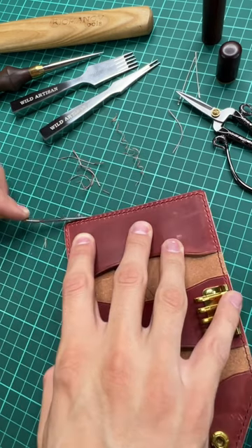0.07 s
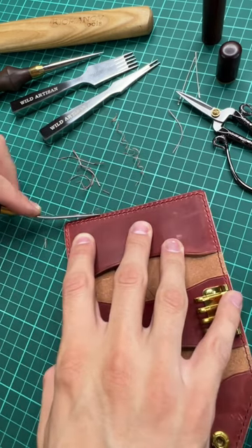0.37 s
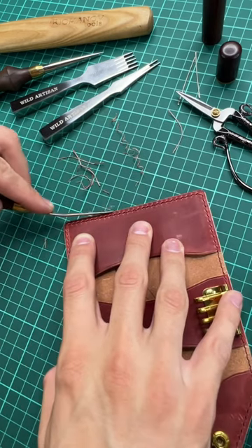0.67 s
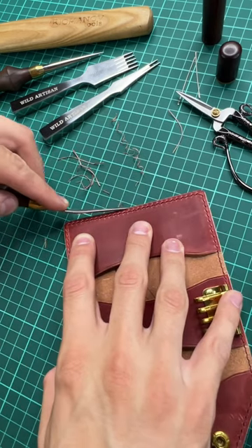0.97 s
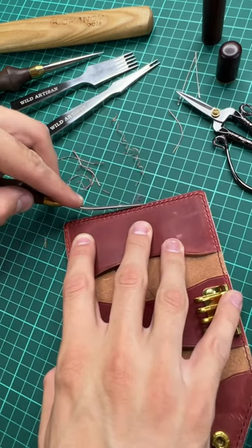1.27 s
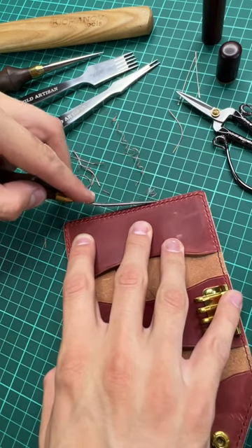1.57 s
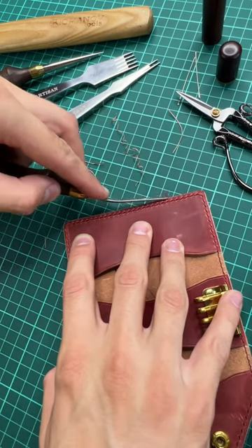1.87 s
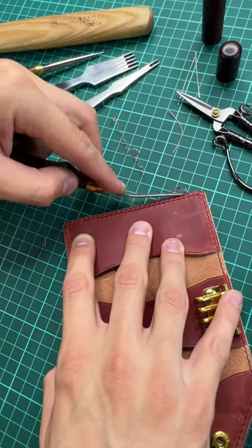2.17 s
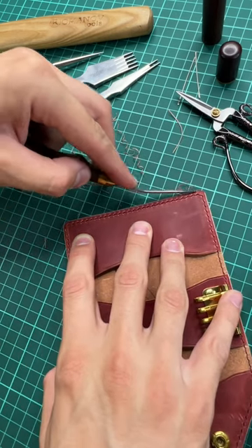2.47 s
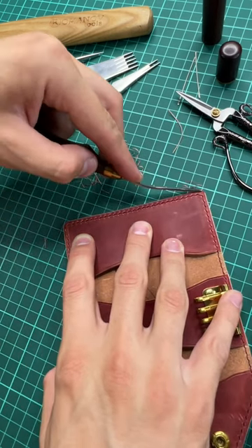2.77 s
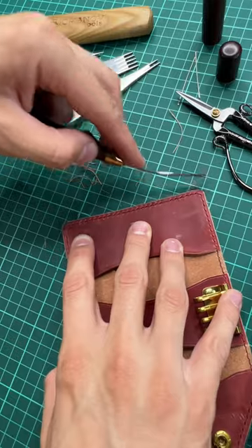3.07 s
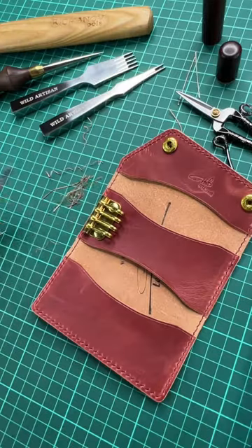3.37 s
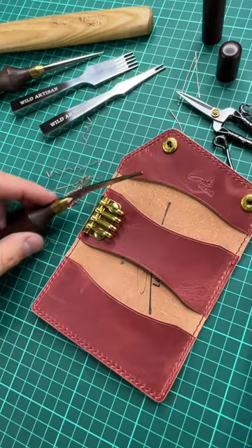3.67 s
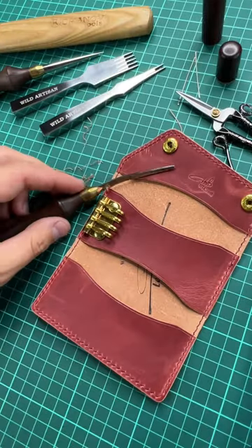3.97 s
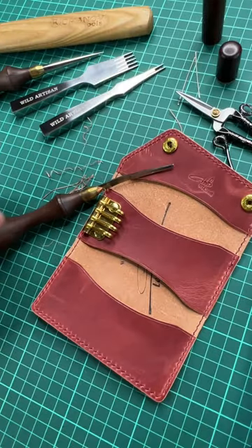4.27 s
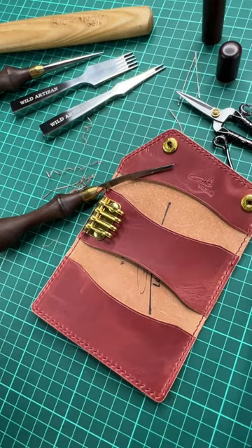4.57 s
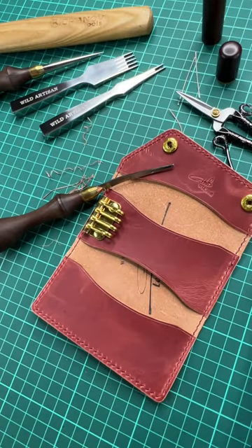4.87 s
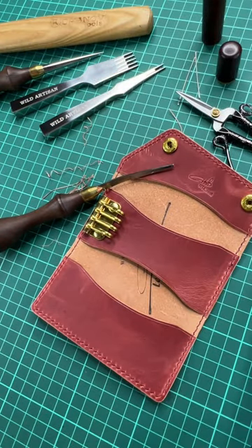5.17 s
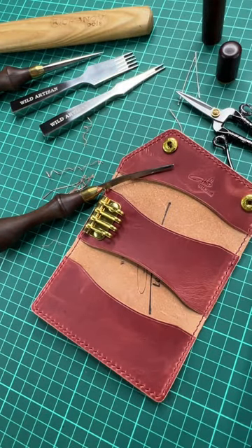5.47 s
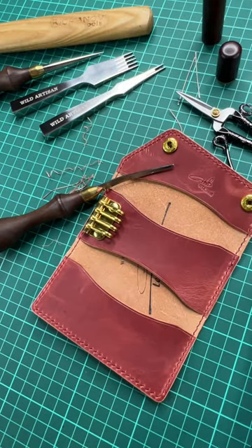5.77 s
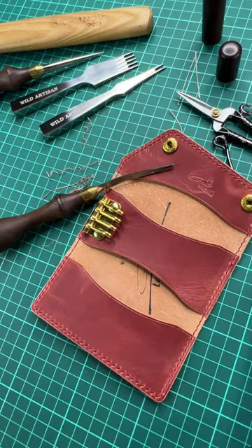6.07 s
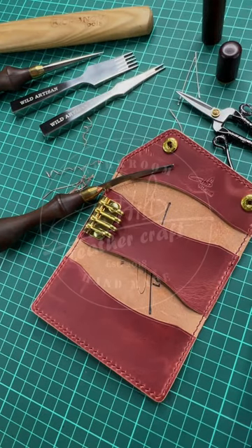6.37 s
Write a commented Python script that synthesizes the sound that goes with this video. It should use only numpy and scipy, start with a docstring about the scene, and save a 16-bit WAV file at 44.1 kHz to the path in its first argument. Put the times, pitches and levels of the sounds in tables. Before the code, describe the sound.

A steel cutter softly shaves a leather edge, then clicks, a hand brushes a mat and something hard knocks on the table.

```python
"""Shaving the edge of a leather wallet

In a small room with a humming fan, an edge cutter shaves a wallet on a mat, close by: tiny fibres snap,
hiss and make the steel ring. The blade clicks off the corner, a hand brushes the mat, something hard
knocks on the table and the cutter is put down. Soft scuffs and thumps follow as the worker moves away."""
import sys
import numpy as np
from scipy import signal
from scipy.fft import rfft, irfft, next_fast_len
from scipy.io import wavfile
from scipy.ndimage import uniform_filter1d

SR = 44100
rng = np.random.default_rng(int(sys.argv[2]) if len(sys.argv) > 2 else 0)


def persist_wave(psi):
    """Save psi, clipped to +-1, as 16-bit WAV."""
    counts = np.round(np.clip(psi, -1, 1) * 32767).astype(np.int16)
    wavfile.write(sys.argv[1], SR, np.atleast_2d(counts).T)


N = 282681
T = np.arange(N) / SR
PADDED = next_fast_len(N, True)
HZ = np.fft.rfftfreq(PADDED, 1 / SR)


def amp(db):
    return 10 ** (np.asarray(db) / 20)


def unit(x):
    """Scales a signal to an average (rms) size of 1."""
    return x / np.sqrt(np.mean(x ** 2) + 1e-30)


def at_hz(points, hz=HZ):
    f, value = np.transpose(points)
    return np.interp(np.log(hz + 1), np.log(f + 1), value)


def over_time(points):
    return np.interp(T, *np.transpose(points))


def add(mix, s, sound):
    part = mix[:, round(s * SR):][:, :sound.shape[-1]]
    part += sound[..., :part.shape[1]]


def pan(db):
    """Gains that make the left channel db louder than the right."""
    return amp(np.array([[db], [-db]]) / 2)


def colour(x, gain):
    """Filters by a gain for each frequency, then scales to size 1."""
    return unit(irfft(rfft(x, PADDED) * gain, PADDED)[..., :N])


def peak(hz, width_hz):
    """Filter gains that favour one narrow band."""
    return 1 / (1 + 1j * (HZ - hz) / width_hz * np.sqrt(2)) ** 2


def resonate(x, hz, width_hz):
    """Makes x ring at a pitch that follows the curve hz."""
    turn = np.exp(2j * np.pi * np.cumsum(hz) / SR)
    decay = np.exp(-np.pi * width_hz / SR)
    return unit((turn * signal.lfilter([1], [1, -2 * decay, decay * decay], x / turn)).real)


def envelope(s, rise, hold, t60):
    """From time s: rises, holds, then fades by 60 dB every t60 seconds."""
    age = np.maximum(T - s, 0)
    return np.minimum(age / rise, 1) * amp(-60 * np.maximum(age - rise - hold, 0) / t60)


def stereo(x, widest_db):
    """Sets the stereo width per band, up to widest_db: mostly centred, wide around 500-950 Hz,
    top treble in opposite phase left and right."""
    # stereo width: f/Hz, side level against mid/dB
    widths = [(50, -12), (120, -8), (220, -6.5), (360, -5), (530, 5.5), (720, 2), (950, 4.5), (1300, -7),
              (1800, -20), (2500, -6), (4400, -2.5), (5600, -10.5), (7200, -14.5), (8300, -4.5), (11200, 2),
              (11800, 10), (12400, 36), (16000, 37)]
    mid, side = rfft(x, PADDED)
    width = amp(np.minimum(at_hz(widths), widest_db))
    left_right = np.array([mid + width * side, mid - width * side]) / np.sqrt(1 + width ** 2)
    return irfft(left_right, PADDED)[:, :N]


def noise(widest_db=32):
    return stereo(rng.standard_normal((2, N)), widest_db)


def drift(rate_hz):
    """A slow random wobble of size 1."""
    return colour(rng.standard_normal(N), 1 / (1 + (HZ / rate_hz) ** 4))


def patchy(x, depth_db=2.0):
    """As the contact travels, narrow bands of the hiss come and go."""
    bands = signal.stft(x, SR, nperseg=512)[2]
    patches = uniform_filter1d(rng.standard_normal(bands.shape[1:]), size=5, axis=0)
    patches = unit(uniform_filter1d(patches, size=36, axis=1))
    return signal.istft(bands * amp(depth_db * patches), SR, nperseg=512)[1][:, :N]


def tiny_snaps(per_s, spread_db):
    """Countless tiny snaps of unequal size at random moments."""
    size = amp(spread_db * np.minimum(rng.exponential(1, N), 4))
    happens = rng.random(N) < per_s / SR
    return unit(stereo(rng.standard_normal((2, N)) * size * happens, widest_db=32))


def room_tail():
    """The room's dense echoes, each band dying at its own speed."""
    # how long the room rings: f/Hz, t60/s
    fades = [(100, 0.25), (280, 0.87), (700, 0.38), (1500, 0.19), (4000, 0.29), (12000, 0.047)]
    hz, t, bands = signal.stft(noise()[:, :SR], SR, nperseg=256)
    fade = amp(-60 * t / at_hz(fades, hz)[:, None])
    tail = signal.istft(bands * fade, SR, nperseg=256)[1][:, :SR]
    tail *= 1 - np.exp(-(T[:SR] / 0.0021) ** 2)
    return tail / np.linalg.norm(tail[0])


def fan_and_lamp(mains_hz=60):
    """A small fan rushes, whistles and hums; a lamp's power supply whines once in every mains cycle."""
    # the fan's rush and its thin treble: f/Hz, level/dB
    rush = [(25, -19), (70, 8.5), (125, 12.5), (200, 4.5), (330, 2), (560, 0), (830, -7), (1200, 3),
            (1550, -1), (2450, -1), (3300, -8), (4200, -13), (5100, -27.5), (6500, -13.5)]
    rush_top = [(7600, -16), (8800, -20), (9900, -27.5), (12000, -25.5), (14000, -12.5), (16000, -44)]
    # fan whistles and lamp whine: f/Hz, width/Hz, level/dB
    whistle_bands = [(1915, 193, -70.5), (2398, 195, -70.5)]
    whine_bands = [(6854, 120, -83), (9126, 170, -81.5)]
    # the fan's wavering hum: f/Hz, level/dB
    hum_tones = [(118.8, -64), (170.3, -72.5)]
    air = amp(-63) * colour(noise(), amp(at_hz(rush + rush_top)))
    flow = noise()
    whistles = sum(amp(db) * colour(flow, peak(hz, width)) for hz, width, db in whistle_bands)
    spurts = unit(amp(6.2 * np.cos(2 * np.pi * mains_hz * T)))
    whine = spurts * sum(amp(db) * colour(flow, peak(hz, width)) for hz, width, db in whine_bands)
    hum = sum(amp(db + 3.74 * drift(6)) * np.sqrt(2) * np.sin(2 * np.pi * hz * T + 0.23 * drift(9.2))
              for hz, db in hum_tones)
    end_dip_db = np.interp(T, [5.9, 6.4], [0, -3])
    return (air + whistles + whine + hum) * amp(end_dip_db)


def table_rumble():
    """The table's lumpy bass: each jolt rises, holds and dies away over a faint tremble."""
    # tone of the shaking table: f/Hz, level/dB
    tone = [(12, -43), (20, -34), (32, 16), (48, 17), (124, -4.5), (145, -30), (166, -34), (193, -0.5),
            (247, -70), (300, -11.5), (390, -52), (660, -120)]
    # tremble under resting arms: t/s, level/dB
    tremble = [(0, -61), (1.3, -66.5), (4.4, -69), (6.05, -72), (6.4, -81)]
    # arms and feet jolting the table: t/s, level/dB, hold/s
    jolts = [(0.305, -49, 0.11), (0.517, -58, 0.19), (1.784, -59.5, 0.056), (2.39, -61.5, .05),
             (2.926, -59, .03), (3.359, -47, 0.012), (3.646, -46.5, 0.22), (3.932, -53, 0.11),
             (5.234, -54, 0.12), (5.37, -57.5, 0.15), (5.672, -48.5, 0.017), (5.787, -60, 0.025)]
    rumble = colour(rng.standard_normal(N), amp(at_hz(tone)))
    rumble /= np.sqrt(uniform_filter1d(rumble ** 2, size=2200) + 0.0055)  # evens out the loudness
    rumble = colour(rumble, 1 - 1 / (1 + (HZ / 31) ** 8))  # cuts below the table's lowest sway
    power = amp(over_time(tremble)) ** 2
    for s, db, hold in jolts:
        power += (amp(db) * envelope(s, rise=0.024, hold=hold, t60=0.37)) ** 2
    return rumble * np.sqrt(power)


def scuffs():
    """Dull scuffs and thumps swell and die away, coloured by the hollow table."""
    # each contact: t/s, level/dB, rise/s, t60/s, treble limit/Hz
    contacts = [(.21, -62.5, 0.046, 2.1, 1030), (2.954, -46, 0.0022, 0.075, 480),
                (3.045, -53.5, 0.0013, 0.079, 525), (3.072, -61, .008, 0.3, 260),
                (3.124, -52, 0.0031, 0.24, 310), (3.17, -59, 0.0055, 0.16, 240),
                (3.628, -55, 0.018, 0.41, 480), (3.742, -60.5, 0.0086, 0.48, 372),
                (4.032, -61.5, 0.0059, 0.57, 350), (4.982, -60, 0.0096, 0.76, 1210),
                (5.014, -55, 0.022, 0.37, 450), (5.229, -53, 0.01, 0.76, 1280),
                (5.25, -56, 0.022, 0.26, 330), (5.41, -59, 0.034, 0.56, 660)]
    # tone of a scuff: f/Hz, level/dB
    tone = [(50, -4), (110, 0.5), (280, 1), (400, -2), (520, -6), (610, -13), (720, -3), (830, 4),
            (980, -4), (1300, 3)]
    # the table's hollow rings: f/Hz, width/Hz, level/dB
    rings = [(510, 30, 3.5), (680, 17, 12), (912, 34, 7), (1054, 54, 7)]
    out, rub = np.zeros((2, N)), noise(widest_db=0.5)
    body = amp(at_hz(tone)) + sum(amp(db) * abs(peak(hz, width)) for hz, width, db in rings)
    for s, db, rise, t60, top_hz in contacts:
        swell = amp(db) * envelope(s, rise, 0, t60)
        out += swell * colour(rub, body / (1 + (HZ / top_hz) ** 6))
    return out


def hand_brush():
    """Skin sliding over the mat makes a gritty hiss that swells and fades with each sweep."""
    # hand sweeps: fastest at t/s, level/dB, swell/s, fade/s, treble tilt/dB per octave
    sweeps = [(3.09, -72, 0.025, 0.025, 5), (3.195, -54.5, 0.031, 0.0094, -12.5),
              (3.24, -59.5, 0.036, 0.032, 1), (3.299, -56.5, 0.034, 0.038, -3.5),
              (3.43, -55.5, 0.1, 0.083, -5.5), (3.579, -58, 0.084, 0.23, -10.5),
              (5.92, -74.5, 0.04, 0.055, -2)]
    # tone of skin on the mat: f/Hz, level/dB
    tone = [(200, -20), (500, -4), (1500, -4.5), (3000, 4), (3900, 5), (4500, 2.5), (5300, -3.5), (6400, 4),
            (7400, 1), (8300, 7.5), (9700, -2), (11000, 1), (13000, -5), (16000, -16)]
    out, grit = np.zeros((2, N)), patchy(tiny_snaps(per_s=10000, spread_db=1))
    treble_octaves = np.log2(1 + (HZ / 4000) ** 2) / 2
    for s, db, swell, fade, tilt_db in sweeps:
        level = amp(db) * np.exp(-((T - s) / np.where(T < s, swell, fade)) ** 2)
        out += level * colour(grit, amp(at_hz(tone) + tilt_db * treble_octaves))
    return out * amp(0.16 * drift(30)) * pan(1.4)


def knock(s=3.3837, crack_low_hz=603):
    """A hard blow cracks, rings the table and what stands on it, then echoes round the room."""
    # ringing tones: f/Hz, level/dB, t60/s, lag of the right channel/radians
    rings = [(157, -28, 0.033, 0.05), (189.4, -36, 0.31, 0.085), (270, -37.5, 0.12, 0.1),
             (301, -47, 0.98, 0.067), (322.5, -31, 0.16, 1), (376, -40.5, 0.3, 0.067),
             (440, -17.5, 0.018, .2), (468, -52, 0.84, 0.81), (534, -22, 0.044, 2.24), (588, -52, 1, 2.1),
             (697.4, -28.5, 0.22, 1.88), (720, -22, 0.13, 3.46), (847, -38, 0.24, 3.35),
             (903, -39, 0.09, 4.1), (996, -37, 0.16, 1.6), (1050, -26, 0.11, 1.74),
             (1225, -41, 0.098, 0.23), (1244, -31.5, 0.06, .4), (1710, -20, 0.035, 0.16),
             (1790, -15.5, 0.03, .05), (2140, -25, 0.03, 2.4), (2310, -30.5, 0.056, 1.7),
             (2590, -19.5, 0.014, 1.7), (3300, -17, 0.0035, 1.3), (4180, -9.5, 0.0056, 1.5),
             (5020, -34, 0.029, 0.79), (6150, -21.5, 0.0056, 0.79), (8060, -21, 0.0046, 0.25),
             (12500, -44, 0.0033, 0.8)]
    # crack, rebound and first echoes: delay/s, level/dB, t60/s, left minus right/dB, treble limit/Hz
    cracks = [(0, -13, 0.003, 1.5, 7300), (.0019, -21.5, 0.0021, 8, 7000), (.0046, -27.5, .012, 4, 6600),
              (0.011, -27, 0.0091, -5, 6200)]
    # tone of the room's echo: f/Hz, level/dB
    echo_tone = [(60, 2.5), (200, 1), (350, 0.5), (500, -1.5), (720, -3), (850, 1.5), (1200, 4.5),
                 (1750, 0.5), (2300, -2.5), (3000, -12.5), (4200, -11.5), (5200, -20), (8000, -15),
                 (10000, -31), (16000, -53)]
    out, echo, t = np.zeros((2, N)), np.zeros((2, N)), T[:SR]
    for hz, db, t60, lag in rings:
        build = 1 - np.exp(-(t / (0.36 / hz + 0.031 * t60)) ** 2)  # low, long tones build up more slowly
        wave = np.sin(2 * np.pi * hz * t - np.array([[0], [lag]]))
        add(out, s, build * amp(db - 60 * t / t60) * wave)
    for delay, db, t60, pan_db, top_hz in cracks:
        crack = amp(db - 60 * t / t60) * rng.standard_normal((2, SR)) * pan(pan_db)
        band = signal.butter(4, [crack_low_hz, top_hz], "bandpass", fs=SR, output="sos")
        add(out, s + delay, signal.sosfilt(band, crack))
    add(echo, s, room_tail())
    return out * pan(2.2) + amp(-56.5) * colour(echo, amp(at_hz(echo_tone)))


def cutter_clicks(echo_db=-17, echo_top_hz=7250):
    """Each light touch is a brief gritty burst that rings the steel and its handle."""
    # touches on leather, mat and brass: t/s, level/dB, tilt/dB per octave, length/s, treble limit/Hz
    touches = [(2.953, -33, 5, 0.0028, 5760), (3.0496, -43.5, -12, 0.0011, 3000),
               (3.055, -48.5, 32, 0.0065, 10000), (3.0870, -52, 26, 0.0048, 16000),
               (3.124, -39, 0.5, 0.0027, 16000), (3.202, -45, 18, 0.0035, 16000),
               (3.9718, -25, 1.5, 0.00085, 13700), (3.9747, -34, -3, 0.00052, 9000),
               (4.402, -55, 3, 0.0053, 7500)]
    # the cutter's ringing tones: f/Hz, level/dB, t60/s
    rings = [(1900, 2.5, 0.0044), (2420, -14, 0.013), (4280, -2, 0.0022), (5890, -6.5, 0.01),
             (7100, -0.5, 0.0031), (8540, -6, 0.0023), (10600, -0.5, 0.0011), (12900, -9, 0.0029),
             (15200, -5, 0.0023)]
    out, t = np.zeros((2, N)), T[:3000]
    no_bass = HZ ** 2 / (HZ ** 2 + 1100 ** 2)
    grit = colour(noise(widest_db=19), no_bass / (1 + (HZ / 15000) ** 12))
    for s, db, tilt_db, length, top_hz in touches:
        ring = np.zeros(len(t))
        for hz, ring_db, t60 in rings:
            level = amp(ring_db + tilt_db * np.log2(hz / 4000) - 60 * t / t60)
            ring += level / (1 + (hz / top_hz) ** 6) * np.sin(2 * np.pi * hz * t)
        burst = grit[:, round(s * SR):][:, :len(t)] * np.exp(-(t / length) ** 2)
        click = signal.fftconvolve(burst, ring[None], axes=1)
        add(out, s, amp(db) * click / abs(click).max())
    # echoes from the soft, cluttered bench lose their treble
    dull = signal.sosfilt(signal.butter(4, echo_top_hz, fs=SR, output="sos"), out)
    echo = signal.fftconvolve(dull, room_tail(), axes=1)[:, :N]
    return out * pan(0.84) + amp(echo_db) * echo


def cutter_ring(snaps, steel_gain):
    """Snapping fibres keep the cutter's handle, blade and stem ringing."""
    # the handle's ring, strongest in mid-stroke: t/s, level/dB
    handle = [(0.1, -87), (0.3, -65), (0.6, -78), (1.05, -92), (1.45, -73), (1.68, -59), (1.9, -63),
              (2.08, -74), (2.9, -91)]
    # two blade rings that trade places as its angle changes: t/s, f/Hz, level/dB
    blade_low = [(0.0, 5660, -9), (0.55, 5660, -9), (0.75, 5840, -2), (1.0, 5720, -9), (1.2, 5670, -1.5),
                 (1.45, 5700, 3.5), (1.65, 5720, 2.5), (1.9, 5630, 3), (2.2, 5820, -4), (2.45, 5760, -5),
                 (2.9, 5800, 6.5)]
    blade_high = [(0.0, 6400, -18), (0.45, 6350, -0.5), (0.72, 6350, 1), (1.05, 6260, -10),
                  (1.55, 6400, -17), (1.8, 6630, -3), (2.0, 6400, 2.5), (2.25, 6360, 0), (2.45, 6260, 5.5),
                  (2.9, 6100, -10)]
    # faint stem rings that come and go as the contact moves: f/Hz, width/Hz, level/dB
    stem = [(3270, 180, -18.5), (3920, 310, -13.5), (6920, 210, -14)]
    # brief zings where the blade catches: t/s, half length/s, f/Hz, level/dB
    zings = [(.02, 0.023, 7650, -68), (.3, .04, 3250, -73), (.44, .035, 3300, -69), (0.743, .04, 7840, -73),
             (0.97, 0.09, 8560, -73), (1.27, 0.083, 7500, -78), (1.656, .045, 8300, -75),
             (1.65, .04, 4000, -76), (1.854, 0.094, 8270, -71), (1.9, 0.076, 10900, -86),
             (2.003, 0.068, 3940, -72), (2.15, 0.034, 8300, -79), (2.158, 0.073, 10850, -74.5),
             (2.43, .03, 3370, -70)]
    ring = amp(over_time(handle)) * colour(snaps, peak(1870, 145))
    for s, hz, db in (np.transpose(blade_low), np.transpose(blade_high)):
        pitch = np.interp(T, s, hz) * (1 + 0.014 * drift(rate_hz=12))
        ring += steel_gain * amp(np.interp(T, s, db)) * resonate(snaps, pitch, width_hz=440)
    for hz, width, db in stem:
        waver = unit(amp(3.5 * drift(rate_hz=3)))
        ring += steel_gain * amp(db) * waver * colour(snaps, peak(hz, width))
    for s, half, hz, db in zings:
        start = max(s - 3 * half, 0)
        part = slice(round(start * SR), round((s + 3 * half) * SR))
        swell = amp(db) * np.exp(-((T[part] - s) / half) ** 2)
        add(ring, start, swell * resonate(snaps[:, part], np.full(len(swell), hz), width_hz=500))
    return ring


def hand_drag():
    """The cutting hand rubs dully over the mat."""
    # how hard it drags: t/s, level/dB
    levels = [(0, -66), (0.6, -68.5), (0.9, -62), (1.1, -64), (1.4, -60), (1.85, -63), (2.1, -67.5),
              (2.5, -62.5), (2.65, -86), (2.88, -68)]
    # tone of the rub: f/Hz, level/dB
    tone = [(80, -35), (160, 3.5), (300, 6.5), (500, -4.5), (750, -0.5), (1000, -7), (1400, -1),
            (2200, -7.5), (5000, -47)]
    return amp(over_time(levels)) * colour(patchy(noise()), amp(at_hz(tone)))


def cutting(usual_bite_db=-68, lift_s=0.018):
    """Leather fibres snap under the blade: the harder it bites, the louder they hiss, rasp and ring it."""
    # how hard the blade bites along its one long stroke: t/s, level/dB
    bite = [(0.0, -72), (0.025, -72.5), (0.1, -82), (0.15, -75), (0.26, -74.5), (0.61, -78), (0.69, -75),
            (0.755, -67.5), (0.82, -75), (0.95, -72), (1.1, -73.5), (1.19, -69.5), (1.42, -73), (1.52, -78),
            (1.6, -71.5), (1.67, -69.5), (1.75, -77.5), (1.83, -71), (1.95, -70.5), (2.06, -79.5),
            (2.15, -70.5), (2.28, -74.5), (2.365, -86), (2.41, -71), (2.45, -71.5), (2.53, -84.5),
            (2.57, -94), (2.78, -95), (2.88, -92), (2.91, -71), (2.94, -83)]
    # tones of the fine hiss and the coarser rasp below it: f/Hz, level/dB
    hiss_tone = [(3500, 1.5), (5000, 1), (5600, 4.5), (7200, 13), (8300, 9), (9300, 5.5), (10900, 4),
                 (12200, -6), (13600, 1), (16000, -19)]
    rasp_tone = [(600, 3.5), (1100, 8), (1450, -1.5), (2400, 4.5), (3200, 5.5), (3450, 2.5), (3850, 4),
                 (4900, -5.5), (7000, -30)]
    # extra rasp, most at the start and towards the corner: t/s, level/dB
    roughness = [(0, 3), (0.45, 4), (0.75, -4.5), (1.25, -1.5), (1.7, 1.5), (2.0, 1), (2.2, -1), (2.45, 0),
                 (2.9, 0)]
    bite_db = over_time(bite) - usual_bite_db
    snaps = tiny_snaps(per_s=7000, spread_db=-0.5)  # fine fibres
    snaps += amp(-11) * tiny_snaps(per_s=400, spread_db=1.3)  # a few tough ones
    grit = patchy(snaps)
    hiss = amp(-64.5 + bite_db) * colour(grit, amp(at_hz(hiss_tone)))
    rasp = amp(-64 + 0.75 * bite_db + over_time(roughness)) * colour(grit, amp(at_hz(rasp_tone)))
    ring = cutter_ring(snaps, steel_gain=amp(-66 + 1.03 * bite_db))
    rub = hand_drag()
    flicker = amp(0.8 * drift(14))
    end_s = bite[-1][0]
    lift_off = np.interp(T, [end_s, end_s + lift_s], [1, 0])
    return ((hiss + rasp + ring) * flicker * pan(0.81) + rub) * lift_off


def scene():
    return cutting() + hand_brush() + table_rumble() + scuffs() + cutter_clicks() + knock() + fan_and_lamp()


def record(dry):
    """Cuts the highest treble, above 15.8 kHz."""
    return signal.oaconvolve(dry, signal.firwin(511, 15800, window=("kaiser", 9), fs=SR)[None], "same")


dry = scene()
out = record(dry)
persist_wave(out)
```